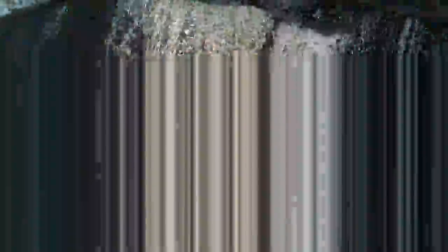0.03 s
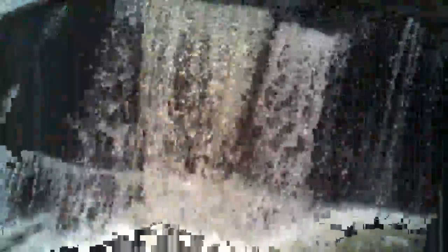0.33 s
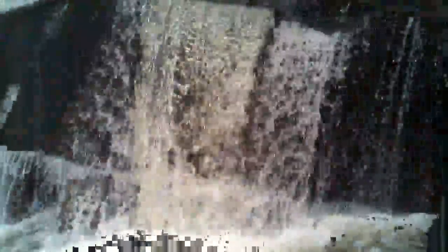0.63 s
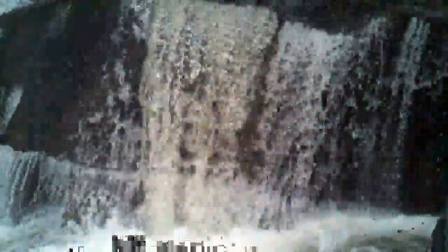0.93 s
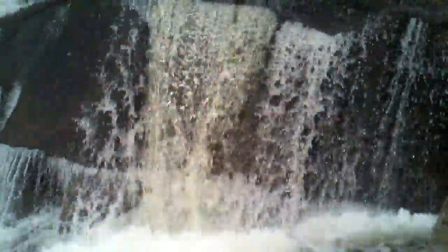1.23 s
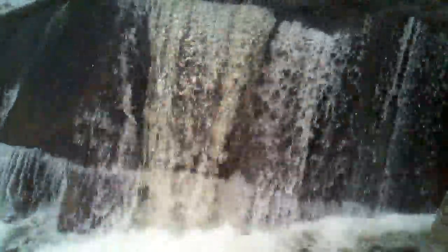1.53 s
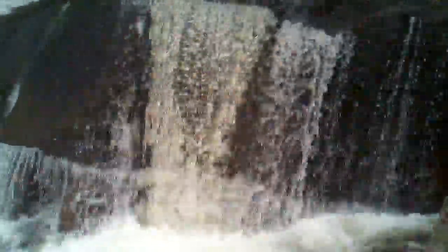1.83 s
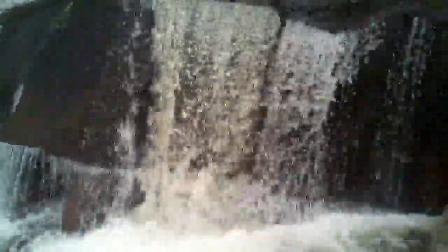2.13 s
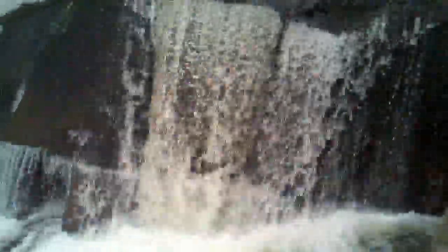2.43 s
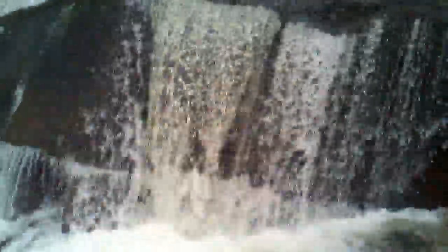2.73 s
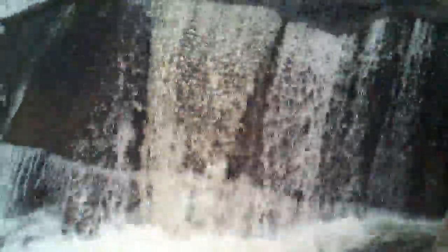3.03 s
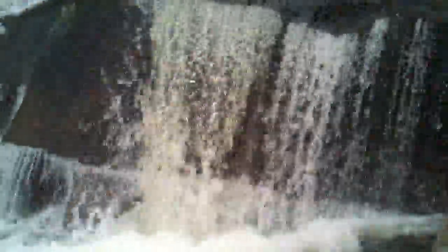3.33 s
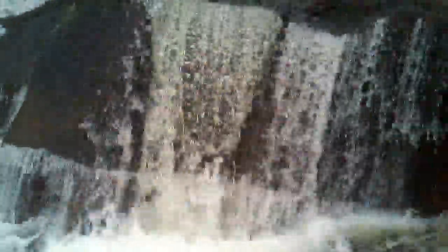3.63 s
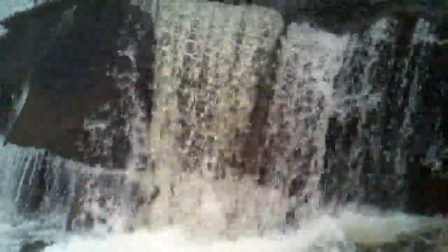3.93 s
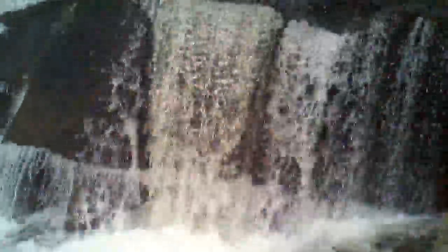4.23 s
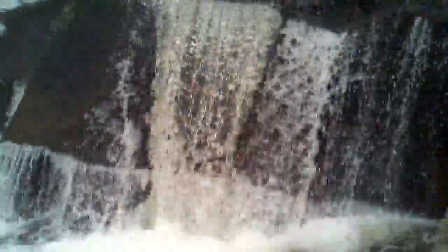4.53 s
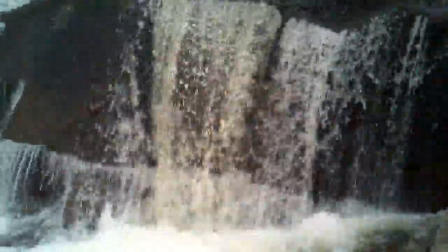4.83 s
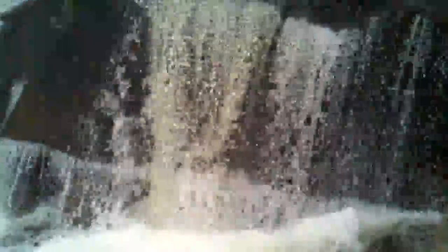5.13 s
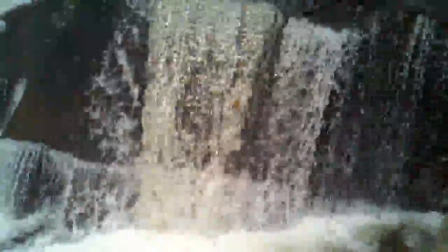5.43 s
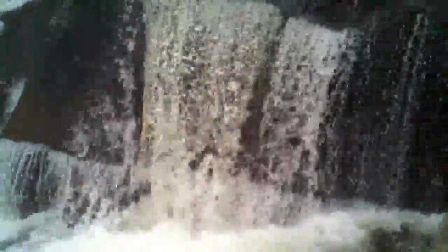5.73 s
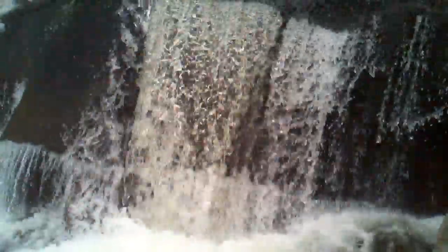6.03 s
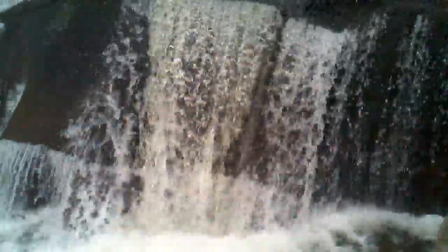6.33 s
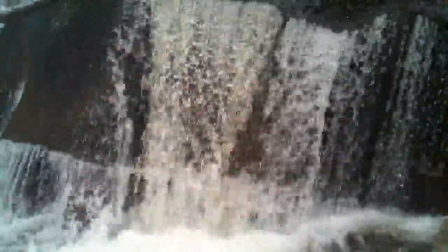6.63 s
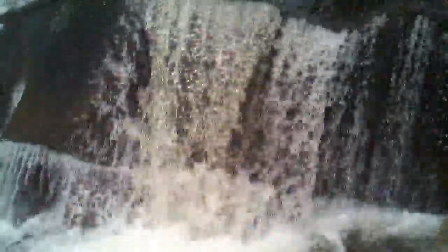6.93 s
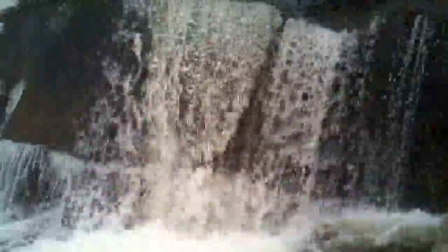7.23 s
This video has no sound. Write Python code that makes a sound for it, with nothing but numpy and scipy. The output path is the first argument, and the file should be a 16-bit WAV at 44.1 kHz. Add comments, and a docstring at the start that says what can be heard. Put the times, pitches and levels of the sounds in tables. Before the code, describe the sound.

A waterfall drops from a rock ledge into a pool a few metres from the microphone. The sound fades in quickly from silence and continues as an even, full rush in wide stereo. Spray hisses and ticks on the rock while the pool bubbles and gulps, swelling slightly now and then as heavier clumps of water land.

```python
"""At a rock ledge, a waterfall pours steadily into a churning pool a few metres away.
Air carried under by the water resonates as bubbles, the larger the lower: big pockets boom and gulp
where the sheet plunges, mid-sized bubbles gurgle in the pool, and small ones crowd the foam.
Spray hisses and ticks on the rock, and thick clumps of water briefly swell the gurgle and the foam.
The sound is heard in widened stereo and fades in from silence."""
import sys
import numpy as np
from scipy import signal
from scipy.fft import rfft, irfft, next_fast_len
from scipy.io import wavfile
from scipy.ndimage import uniform_filter1d, map_coordinates

SR = 44100
rng = np.random.default_rng(int(sys.argv[2]) if len(sys.argv) > 2 else 0)


def pcm_store(signal):
    """Save signal as 16-bit PCM."""
    levels = np.round(np.clip(np.atleast_2d(signal), -1, 1) * 32767)
    wavfile.write(sys.argv[1], SR, levels.astype(np.int16).T)


N = 326340

# Relative spectral density of each part of the fall: frequency_hz, level_db
PLUNGE_SPECTRUM = [(25, -45), (45, -33), (65, -29.5), (90, -15), (165, -6.5), (205, -4), (255, -1.8),
                   (300, -1), (340, -6), (480, -13), (900, -54)]
GURGLE_SPECTRUM = [(150, -44), (300, -11.5), (385, -4), (470, -2.5), (530, -2), (595, -1), (745, -2.5),
                   (850, -9), (1100, -17), (2000, -38)]
FOAM_SPECTRUM = [(450, -36), (800, -1), (1000, -1), (1450, -1.5), (1700, -2.5), (2050, -2.5), (2500, -6.5),
                 (3200, -12.5), (6000, -38)]
SPRAY_SPECTRUM = [(1200, -64), (2800, -5), (3800, -4.5), (5000, -4.5), (6300, -2), (7800, -0.5), (9500, -3),
                  (11500, -7.5), (13800, -11)]
# How hard the pool boils, about its mean: time_s, lift_db
POOL_BOIL = [(1.2, 0), (1.6, -0.3), (2.3, 0.1), (3.0, 0), (3.7, 0.5), (4.7, -0.3), (5.3, 1.7), (5.9, 1),
             (6.3, 0.2), (7.0, -0.2)]
# How much white water is thrown up as foam and spray, about its mean: time_s, lift_db
WHITE_WATER = [(2.0, -0.5), (3.0, 0.5), (5.0, 0), (7.0, 0.3)]
# The largest air pockets: start_s, pitch_hz, level_db
AIR_POCKETS = [(0.912, 295, -28), (0.94, 556, -31), (1.105, 273, -26.5), (1.195, 603, -25),
               (1.495, 308, -28), (1.727, 698, -30), (1.756, 840, -30), (1.768, 283, -25),
               (2.145, 574, -26), (2.755, 754, -30), (2.81, 697, -26), (3.048, 640, -30),
               (3.755, 280, -27.5), (4.16, 558, -29), (5.06, 250, -30), (5.318, 587, -27),
               (5.576, 765, -28), (5.916, 717, -27), (6.168, 658, -27), (6.467, 460, -26), (6.48, 267, -29),
               (7.308, 268, -26.5)]
# Thick clumps of water hitting the pool: centre_s, gurgle_lift_db, foam_lift_db
WATER_CLUMPS = [(0.96, 2.4, -2), (1.21, 1, 0), (1.40, 5, 1.8), (1.75, 2.5, 1.5), (2.24, 1.5, 1),
                (2.35, 4.5, -1.5), (2.83, 2.8, 0.5), (2.92, 2.5, 3), (3.07, 1, 2), (3.43, 0.5, 1.5),
                (3.59, 2, 2.5), (3.86, 4, 0), (4.01, 0, 1.5), (4.17, 1, 3), (5.2, 1.5, 1.2),
                (5.59, 1.8, 0.3), (5.69, 1.5, 2.5), (6.18, 2, 0.5), (6.48, 3, -1), (6.95, 2, 2),
                (7.31, 3, 1.5)]
# Likeness of the two channels, from 0 to 1: frequency_hz, coherence
STEREO_COHERENCE = [(55, .2), (100, 0.75), (170, 0.76), (225, 0.83), (312, 0.78), (350, 0.55), (400, 0.28),
                    (450, 0.52), (510, .81), (700, 0.89), (840, 0.81), (1000, 0.94), (1200, 1), (1350, 1),
                    (1500, .88), (1700, 0.6), (1950, 0.14), (2300, .45), (2430, .75), (2520, 1), (2710, 1),
                    (2770, .78), (2870, 0.55), (3220, 0.33), (3550, 0.68), (3760, .98), (4130, .98),
                    (4250, 0.52), (4720, 0.2), (5150, 0.47), (5500, 0.22), (8000, 0.2), (13500, 0.18)]
# Level of the left channel over the right: frequency_hz, difference_db
STEREO_BALANCE = [(55, 1), (100, 5), (175, 4.5), (310, 2), (400, 4.4), (600, 1.2), (850, 1.4), (1300, -0.4),
                  (1700, -2.5), (2200, -3), (2430, -1.8), (2520, 0), (2710, 0), (2900, -2), (3200, -2),
                  (3800, 0), (4150, 0), (4600, -1.3), (5200, -0.4), (10000, -0.1)]
# Phase of the left channel ahead of the right: frequency_hz, lead_rad
STEREO_PHASE = [(100, 0.33), (250, 0.05), (340, .5), (420, -.5), (520, -0.2), (780, 0.12), (1200, 0),
                (1370, 0), (1700, -.9), (2020, -1.5), (2380, -3.14), (2880, -3.14), (3250, -1.25),
                (3750, 0), (3900, 0), (4170, -0.6), (4650, 0), (5000, .1), (5600, .15)]

PLUNGE_DB, GURGLE_DB, FOAM_DB, SPRAY_DB = -31, -27.5, -26, -26  # mean levels before stereo widening


def amp(db):
    """Amplitude grows tenfold for every 20 dB."""
    return 10 ** (np.asarray(db) / 20)


def unit_rms(x):
    """Division by the rms gives a signal unit power."""
    return x / np.sqrt(np.mean(x ** 2) + 1e-20)


def curve_at(points, hz):
    """Interpolation on a logarithmic frequency axis."""
    knots_hz, values = np.transpose(points)
    return np.interp(np.log(hz + 1), np.log(knots_hz + 1), values)


def filtered(x, response):
    """A linear filter multiplies the spectrum by a complex frequency response."""
    size = next_fast_len(N + 8192)
    hz = np.fft.rfftfreq(size, 1 / SR)
    return irfft(rfft(x, size) * response(hz), size)[..., :N]


def coloured(x, spectrum):
    """Spectral shaping sets the timbre, at unit power."""
    return unit_rms(filtered(x, lambda hz: amp(curve_at(spectrum, hz))))


def surge(depth_db, rate_hz):
    """Random amplitude modulation: a smooth chance rise and fall of level, in dB."""
    knots = rng.standard_normal(int(N * rate_hz / SR) + 4)
    return depth_db * map_coordinates(knots, [np.arange(N) * rate_hz / SR])


def drift(points):
    """Slow amplitude modulation: the level in dB moves linearly between points in time."""
    return np.interp(np.arange(N) / SR, *np.transpose(points))


def rush(patchy_db):
    """Countless splashes superpose into two noises whose gain drifts in patches of time and pitch."""
    spectra = signal.stft(rng.standard_normal((2, N)), nperseg=512)[2]
    patches = uniform_filter1d(rng.standard_normal(spectra.shape), size=7, axis=1)  # across frequency
    patches = uniform_filter1d(patches, size=12, axis=2)  # across time
    return signal.istft(spectra * amp(patchy_db * unit_rms(patches)), nperseg=512)[1][:, :N]


def bubbles(count, low_hz, high_hz, decay_cycles, scatter_db, rise):
    """Each bubble is a damped oscillator whose pitch climbs as it nears the surface."""
    when, pitch, rank, pan = rng.random((count, 4)).T[:, :, None]
    hz = low_hz * (high_hz / low_hz) ** pitch
    samples = np.arange(min(int(3 * decay_cycles * SR / low_hz), 3000000 // count))
    turns = (hz * samples / SR).astype(np.float32)
    age = turns / decay_cycles
    # a few are much louder than the rest; height grows with pitch because high rings are brief
    height = hz * amp(-scatter_db * np.log(np.maximum(rank, .003)))
    rings = height * np.exp(-age) * np.sin(2 * np.pi * turns * (1 + rise * age / 2))
    at = ((when * N).astype(int) + samples).ravel()
    return np.array([np.bincount(at, (rings * np.sqrt(share)).ravel(), N)[:N]
                     for share in (pan, 1 - pan)])


def water(spectrum, wash, grains, grain_db):
    """Single bubbles or drops are partly masked by a wash of the same colour."""
    return unit_rms(coloured(wash, spectrum) + amp(grain_db) * coloured(grains, spectrum))


def plunge():
    """Air entrainment: the falling sheet drives large pockets under, which resonate in a low boom."""
    pockets = bubbles(count=600, low_hz=200.5, high_hz=348, decay_cycles=5, scatter_db=1.5, rise=0.015)
    level_db = PLUNGE_DB + surge(depth_db=0.22, rate_hz=7.3)
    return amp(level_db) * water(PLUNGE_SPECTRUM, rush(patchy_db=0.5), pockets, grain_db=-10)


def gurgle(lift_db):
    """Bubble resonance: mid-sized bubbles sound hollow notes as the pool boils up."""
    notes = bubbles(count=1400, low_hz=438.2, high_hz=797, decay_cycles=12.2, scatter_db=1.5, rise=0.025)
    level_db = GURGLE_DB + drift(POOL_BOIL) + lift_db + surge(depth_db=0.32, rate_hz=6.3)
    return amp(level_db) * water(GURGLE_SPECTRUM, rush(patchy_db=0.5), notes, grain_db=-5.5)


def foam(lift_db):
    """Resonant frequency varies inversely with radius, so the small bubbles of white water ring high."""
    froth = bubbles(count=4500, low_hz=797.5, high_hz=2760, decay_cycles=7.1, scatter_db=2, rise=0.042)
    level_db = FOAM_DB + drift(WHITE_WATER) + lift_db + surge(depth_db=0.13, rate_hz=4.34)
    return amp(level_db) * water(FOAM_SPECTRUM, rush(patchy_db=1.6), froth, grain_db=-6.5)


def spray():
    """Brief impacts have broad spectra: droplets tick on rock and water within a fine hiss."""
    drops = bubbles(count=11000, low_hz=2640, high_hz=12100, decay_cycles=2.2, scatter_db=2, rise=0.039)
    level_db = SPRAY_DB + drift(WHITE_WATER) + surge(depth_db=0.16, rate_hz=14)
    return amp(level_db) * water(SPRAY_SPECTRUM, rush(patchy_db=2.5), drops, grain_db=-7.5)


def gulps(attack_s=0.013, rise_per_s=0.3):
    """The largest air pockets pulsate in damped oscillation, each a short note that climbs a little."""
    track = np.zeros(N + SR)
    t = np.arange(SR // 4) / SR
    envelope = t / attack_s * np.exp(1 - t / attack_s)
    for start_s, pitch_hz, level_db in AIR_POCKETS:
        turns = rng.random() + pitch_hz * t * (1 + rise_per_s * t / 2)
        track[round(start_s * SR):][:len(t)] += amp(level_db) * envelope * np.sin(2 * np.pi * turns)
    return track[:N]


def clumps(half_width_s=0.015):
    """Each landing clump modulates gurgle and foam with a Gaussian pulse: two curves in dB."""
    centre_s, *lifts_db = np.transpose(WATER_CLUMPS)
    landings = np.exp(-((np.arange(N) / SR - centre_s[:, None]) / half_width_s) ** 2)
    return np.array(lifts_db) @ landings


def stereo_widening(pair, treble_hz=3900, treble_lead_s=1 / 2600):
    """The channels' coherence, level and phase vary with pitch; near 2.6 kHz their phases are opposite."""
    def blend_rad(hz):
        return np.arcsin(np.clip(curve_at(STEREO_COHERENCE, hz), 0, 1)) / 2

    def level_and_phase(hz):
        side = np.array([[.5], [-.5]])  # left and right each take half the difference
        # a time lead turns the treble's phase in step with frequency
        treble_rad = 2 * np.pi * treble_lead_s * np.maximum(hz - treble_hz, 0)
        lead_rad = curve_at(STEREO_PHASE, hz) + treble_rad
        return amp(side * curve_at(STEREO_BALANCE, hz)) * np.exp(1j * side * lead_rad)

    own = filtered(pair, lambda hz: np.cos(blend_rad(hz)))
    shared = filtered(pair[::-1], lambda hz: np.sin(blend_rad(hz)))
    return filtered(own + shared, level_and_phase)


def scene():
    """Superposition: all parts of the fall add, and their sum is widened in stereo."""
    gurgle_lift_db, foam_lift_db = clumps()
    return stereo_widening(plunge() + gurgle(gurgle_lift_db) + foam(foam_lift_db) + spray() + gulps())


def record(dry):
    """A nearly linear gain ramp fades the sound in, and a steep low-pass filter limits its band."""
    fade_start_s, fade_end_s = 0.67, 0.95
    cutoff_hz, edge_hz = 13920, 50
    ramp = np.clip((np.arange(N) / SR - fade_start_s) / (fade_end_s - fade_start_s), 0, 1)
    return filtered(dry * ramp ** 1.1, lambda hz: (1 - np.tanh((hz - cutoff_hz) / edge_hz)) / 2)


dry = scene()
out = record(dry)
pcm_store(out)
```